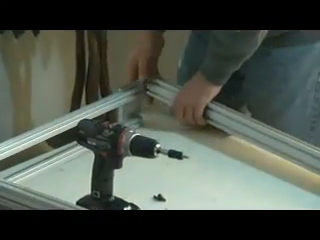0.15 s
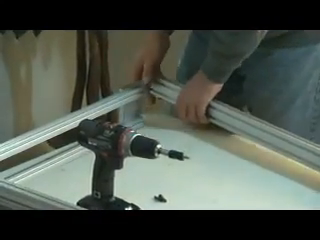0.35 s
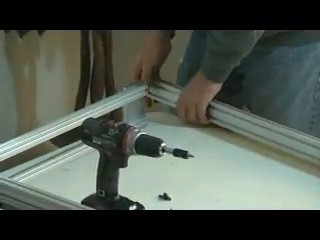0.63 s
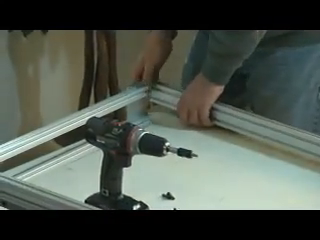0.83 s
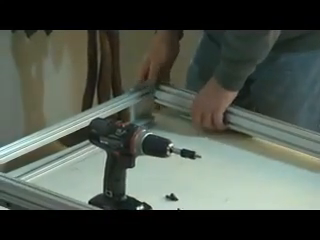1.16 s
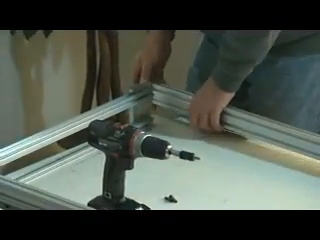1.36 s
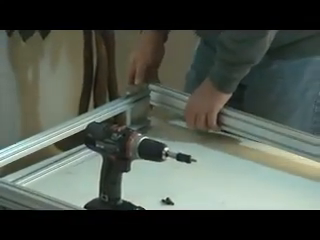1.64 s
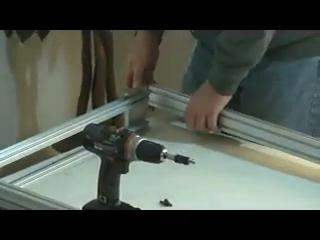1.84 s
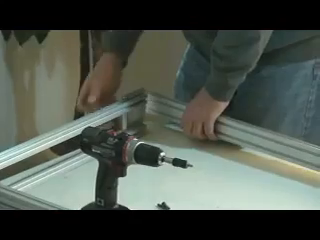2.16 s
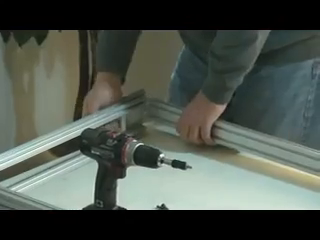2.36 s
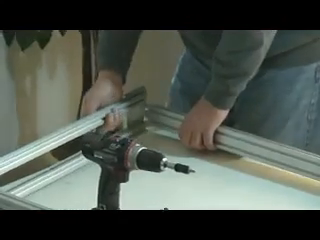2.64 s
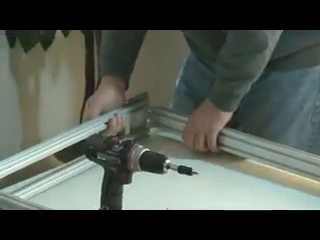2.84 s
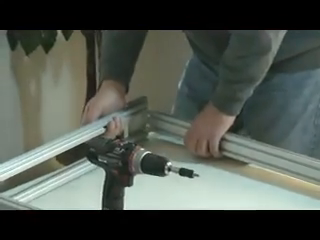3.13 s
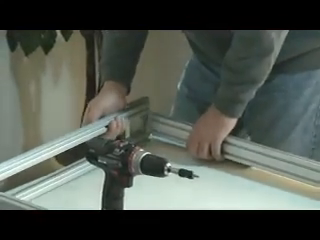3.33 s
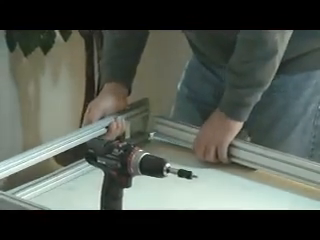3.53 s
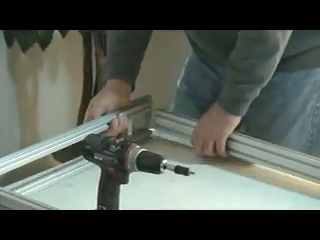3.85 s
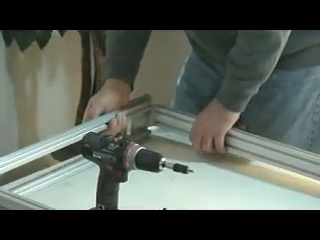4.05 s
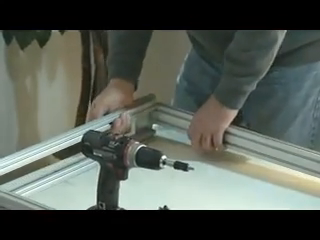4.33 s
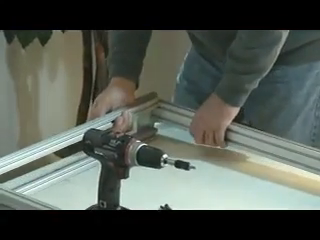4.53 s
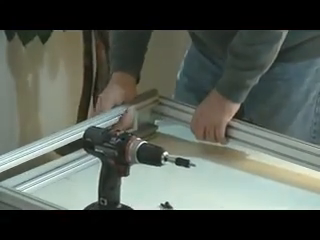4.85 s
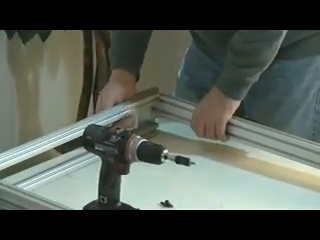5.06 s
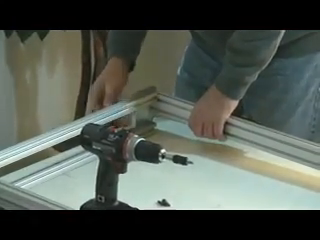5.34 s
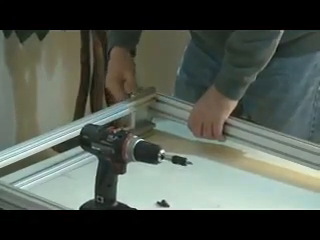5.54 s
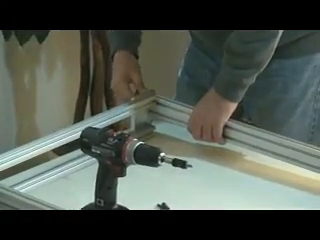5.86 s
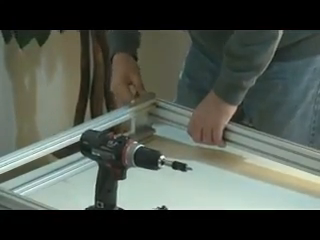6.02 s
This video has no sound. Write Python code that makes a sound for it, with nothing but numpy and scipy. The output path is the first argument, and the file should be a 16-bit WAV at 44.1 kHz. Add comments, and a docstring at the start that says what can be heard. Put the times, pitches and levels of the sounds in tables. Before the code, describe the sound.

Aluminium rails drag with a dull, rasping scrape, then bang together in resonant clusters with bench thuds in a small, echoing workshop.

```python
"""Aluminium rails fitted by hand

Hollow rails are fitted on a bench in a small, live workshop. One is dragged over the bench, then along its
neighbour: streams of stick-slip clicks drive the rail, over bench judder. Small shifts in the hand rub likewise.
Knocks sum a crack, ringing modes, echoes, edge grit, frame thud and bench boom. A corner plate clinks near
the start and at the end, from its own modes and echoes. Shaped noise and faint wavering tones lie underneath."""
import sys
import numpy as np
from scipy import signal
from scipy.fft import rfft, irfft, next_fast_len
from scipy.io import wavfile

SR = 44100
rng = np.random.default_rng(int(sys.argv[2]) if len(sys.argv) > 2 else 0)


def persist_wave(psi):
    """Save psi, clipped to +-1, as 16-bit WAV."""
    counts = np.round(np.clip(psi, -1, 1) * 32767).astype(np.int16)
    wavfile.write(sys.argv[1], SR, np.atleast_2d(counts).T)


N = 272979
RING_S = np.arange(3 * SR // 4) / SR   # time axis of one blow's decay
BENCH_HZ = 102.1   # lowest mode of the bench top


def from_db(db):
    """Decibels to amplitude."""
    return 10 ** (np.asarray(db) / 20)


def rms_one(x):
    """Scales to rms 1."""
    return x / np.sqrt(np.mean(x ** 2) + 1e-20)


def cut(x, hz, kind, order=2):
    """Butterworth filter."""
    sos = signal.butter(order, np.clip(hz, 10, .45 * SR), kind, fs=SR, output="sos")
    return signal.sosfilt(sos, x)


def resonance(x, hz, width_hz):
    """Two-pole resonance, gain 1 on top."""
    r = np.exp(-np.pi * width_hz / SR)
    numerator = np.array([1, 0, -1]) * (1 - r * r) / 2
    denominator = [1, -2 * r * np.cos(2 * np.pi * hz / SR), r * r]
    return signal.lfilter(numerator, denominator, x)


def at_hz(points, hz):
    """Reads a table of (Hz, value) on a log frequency axis."""
    table_hz, value = np.array(points).T
    return np.interp(np.log(hz + 1e-9), np.log(table_hz), value)


def drift(rate_hz):
    """Slow random drift: normal knots of spread 1, joined by lines."""
    knots = rng.standard_normal(1024)
    return np.interp(np.arange(N) / SR * rate_hz, np.arange(len(knots)), knots)


def fade(t60_s):
    """Exponential decay, 60 dB in t60_s."""
    return np.exp(-np.log(1000) * RING_S / t60_s)


def swell(t, start_s, end_s, attack_s, release_s):
    """Attack, hold and release, in straight lines."""
    return np.clip(np.minimum((t - start_s) / attack_s, (end_s - t) / release_s), 0, 1)


def add(out, s, sound):
    """Mixes a stereo sound in at time s."""
    start = round(s * SR)
    out[:, start:start + sound.shape[1]] += sound[:, :N - start]


def stereo(mid, side):
    """Left and right from mid and side."""
    return mid + side * np.array([[1], [-1]])


# stereo width, bass alike and middle range different: freq_hz, side_re_mid_db
WIDTH = [(100, -19), (170, -17), (260, -19), (400, -10.5), (600, -8), (1000, -5.5), (2000, -3),
         (4000, -2.5), (8000, -37), (11500, -37)]


def coloured(points, size, width=WIDTH):
    """Stereo noise with the spectrum of a (Hz, dB) table."""
    padded = next_fast_len(size)
    hz = np.arange(padded // 2 + 1) * SR / padded
    mid, side = rfft(rng.standard_normal((2, padded))) * from_db(at_hz(points, hz))
    side = side * from_db(at_hz(width, hz))
    return irfft(stereo(mid, side), padded)[:, :size]


# workshop air spectrum: freq_hz, relative_density_db
AIR_SPECTRUM = [(12, -38), (22, -10), (45, 3), (80, -14), (110, -8), (200, -11), (380, -11), (600, -15),
                (1500, -21), (2500, -26), (5000, -29.5), (10000, -33.5), (12500, -30), (15000, -39.5)]
# width of the air noise: freq_hz, side_re_mid_db
AIR_WIDTH = [(60, -22), (99, -10.5), (160, -6.5), (270, -5.5), (450, -4), (740, -1), (1220, 0.5), (2010, 2),
             (3330, 1), (5500, -8.5), (9080, -8), (15000, -34)]
# hum and thin electrical whine, centre values: freq_hz, level_db (rms)
HUM_TONES = [(37.7, -57), (120, -66), (322, -68), (435, -63), (3031, -81), (5970, -81), (8969, -84),
             (14244, -81)]


def workshop_air(air_db=-46, wander_hz=2.69, waver_db=2):
    """Steady shaped noise, with faint tones drifting in pitch and level."""
    air = from_db(air_db) * rms_one(coloured(AIR_SPECTRUM, N, AIR_WIDTH))
    for tone_hz, level_db in HUM_TONES:
        phase = 2 * np.pi * np.cumsum(tone_hz + wander_hz * drift(12)) / SR
        gain = from_db(level_db + waver_db * drift(1.8))
        air = air + np.sqrt(2) * gain * np.sin(phase)
    return air


def reflections(colour, early=0.34, early_t60_s=0.048, late_t60_s=0.7, treble_t60_s=0.46, dull_hz=3000):
    """Dense workshop echoes: strong from nearby surfaces at first, the treble dying sooner."""
    noise = coloured(colour, len(RING_S))
    low = cut(noise, dull_hz, "low", order=1)
    late = low * fade(late_t60_s) + (noise - low) * fade(treble_t60_s)
    return late + early * noise * fade(early_t60_s)


def ringing(modes, lift_db=0, flutter=.6, count=40):
    """Decaying modes; echoes of each mode add to it and make its level and phase flutter."""
    hz, level_db, t60_s = np.transpose(modes)[:, :, None]
    turn = (2 * np.pi * hz * RING_S).astype(np.float32)
    fine = np.linspace(0, count - 1, len(RING_S))
    waves = []
    for share_db in (0, at_hz(WIDTH, hz)):   # mid, then side
        echoes = rng.standard_normal((len(hz), count, 2)) @ [1, 1j]
        paths = np.exp(2j * np.pi * rng.random(hz.shape)) + flutter * echoes
        smooth = np.array([np.interp(fine, np.arange(count), path) for path in paths])
        envelope = smooth * fade(t60_s)
        wave = envelope.real * np.sin(turn) + envelope.imag * np.cos(turn)
        waves.append(np.sum(from_db(level_db + lift_db + share_db) * wave, axis=0))
    return stereo(*waves)


# corner plate touching the rail: start_s, level_db
CLINKS = [(0.243, -63), (5.997, -41.5)]
# plate modes: freq_hz, relative_db, t60_s
PLATE_MODES = [(1441, 0, .55), (2234, -1, .7), (2264, -1, .7), (2305, -6, .6), (2475, -8, .5),
               (3190, -8, .5), (3590, -11, .5), (4235, -6, .5), (4325, -7, .5), (5080, -10, .5),
               (6340, -18, .4)]


def clinks(room_db=5, low_hz=1300, high_hz=5400):
    """The small plate rattles and rings high; it does not move the bench."""
    out = np.zeros((2, N))
    tick_colour = [(low_hz / 2, -12), (low_hz, 0), (high_hz, -2), (2 * high_hz, -18)]
    for start_s, level_db in CLINKS:
        tick = from_db(room_db) * reflections(tick_colour)
        plate = .55 * ringing(PLATE_MODES, flutter=1.0, count=110)
        add(out, start_s, from_db(level_db) * (plate + tick))
    return out


# bending and wall modes of the rails: freq_hz, relative_db, t60_s
RAIL_MODES = [(234, -7, .5), (279, -4, .55), (335, -2, .55), (378, -5, .6), (420, -8, .55), (620, -4, .6),
              (689, -3, .65), (767, -4, .5), (975, -3, .65), (1037, -2.5, .7), (1092, -4, .65),
              (1196, -3, .55), (1293, -3, .55), (1371, -2, .8), (1474, 0, .7), (1606, -1, .6),
              (1860, 1, .6), (2235, 2, .6), (2305, -1, .6), (2514, -6, .6), (2840, 0, .65), (3180, -6, .55),
              (3321, -1, .55), (3540, -2, .55)]


def rail_response(crack, modes_db, colour, lift_db=0, lowest_hz=210, wall_hz=3900, room_db=-3.5):
    """One click on a rail: direct crack, ringing modes and room; the slim profile radiates little bass."""
    direct = cut(crack * (RING_S == 0), wall_hz, "low", order=3)
    modes = from_db(modes_db) * ringing(RAIL_MODES, lift_db)
    room = from_db(room_db) * reflections(colour)
    return cut(direct + modes + room, lowest_hz, "high")


# rail pressed to a surface while sliding: freq_hz, relative_db
RUB_COLOUR = [(150, -1.5), (210, -1), (290, 0), (390, 0), (480, -0.5), (650, 1), (830, 8), (1100, 3.5),
              (1400, 4.5), (3500, -0.5), (5500, -6), (10000, -16.5)]


def friction(level_db, low_hz, high_hz, slips_per_s, uneven_db, modes_db, order=2):
    """Stick and slip: a stream of uneven clicks into the rail, in a band set by the surfaces that rub."""
    struck = rng.random(N) < slips_per_s / SR
    slips = struck * rng.standard_normal(N) * from_db(uneven_db * drift(45))
    pressed = rail_response(crack=14.3, modes_db=modes_db, colour=RUB_COLOUR, lowest_hz=113)
    pressed = pressed * fade(2.05)   # the contact damps the ring
    body = cut(pressed, [low_hz, high_hz], "band", order=order)
    body = body / np.sqrt(np.sum(body ** 2) / 2)
    drive = rms_one(slips) * from_db(level_db)
    return signal.fftconvolve(drive[None], body, axes=1)[:, :N]


# small shifts of the rail in the hand: start_s, length_s, level_db, brightness_db
NUDGES = [(0.416, 0.14, -54, -7.5), (2.22, 0.094, -69.5, 21.5), (2.388, .12, -51, 3.5),
          (3.14, 0.48, -54, -1), (3.477, 0.26, -50, 10), (3.826, 0.62, -52, -2.5)]


def nudges(t, rumble_db=1, rasp_db=-2.0, hiss_db=-3, attack_s=0.071, release_s=0.026):
    """Gains of rumble, rasp and hiss for the small shifts; brightness tips each from rumble to hiss."""
    gains = 0
    for start_s, length_s, level_db, bright_db in NUDGES:
        balance_db = np.array([[rumble_db - bright_db], [rasp_db], [hiss_db + bright_db]])
        envelope = swell(t, start_s, start_s + length_s, attack_s, release_s)
        gains = gains + from_db(level_db + balance_db) * envelope
    return gains


# the long drag: time_s, rub_db, treble_db
DRAG = [(0.56, -46, -64), (0.674, -31.5, -61), (0.928, -29.5, -50.5), (1.028, -30, -52.5),
        (1.15, -31.5, -42), (1.26, -27.5, -30.5), (1.326, -32.5, -48), (1.362, -48, -39), (1.42, -36, -55)]
# the rail's weight passes from bench to neighbour; the rub tips from rumble to rasp
HANDOVER_S, HANDOVER_TAKES_S, HANDOVER_DB = 1.045, .05, 4.5


def drag(t, rumble_db=-1, rasp_db=-5, hiss_db=0):
    """The same three gains in the long drag: dull on the bench, raspier on the other rail."""
    time_s, rub_db, treble_db = np.transpose(DRAG)
    rub_db, treble_db = np.interp(t, time_s, rub_db), np.interp(t, time_s, treble_db)
    tip_db = HANDOVER_DB * np.clip((t - HANDOVER_S) / HANDOVER_TAKES_S, 0, 1)
    gains = from_db([rub_db + rumble_db - tip_db, rub_db + rasp_db + tip_db, treble_db + hiss_db])
    return gains * (t > time_s[0]) * (t < time_s[-1])


def bench_judder(t, rumble_db, firm_db=-31.5, shake_db=-33, shake_follows=.35, shake_hz=30):
    """Slips lock to the bench mode only under a firm drag; stray ones shake it unevenly."""
    firm = from_db(firm_db) * swell(t, start_s=0.497, end_s=0.99, attack_s=0.16, release_s=0.14)
    phase = 2 * np.pi * np.cumsum(BENCH_HZ + 3 * drift(15.8)) / SR
    locked = firm * np.sqrt(2) * np.sin(phase)
    shaken = resonance(cut(rng.standard_normal(N), 280, "low"), BENCH_HZ, shake_hz)
    stray = from_db(shake_db + shake_follows * rumble_db) * rms_one(shaken)
    return cut(locked + stray, [BENCH_HZ - 25, BENCH_HZ + 40], "band", order=1)


def slides(build_up_s=0.012, sizzle_db=-14):
    """Rubbing rail: the bench judders and rumbles, the metal rasps, hisses and sizzles."""
    t = np.arange(N) / SR
    early = t + build_up_s   # gains lead, as the ring takes time to build up
    rumble_db, rasp_db, hiss_db = 20 * np.log10(drag(early) + nudges(early) + 1e-9)
    judder = bench_judder(t, rumble_db)
    rumble = friction(rumble_db, low_hz=139, high_hz=480, slips_per_s=1200, uneven_db=0.0, modes_db=-35.5)
    rasp = friction(rasp_db, low_hz=644, high_hz=1400, slips_per_s=1600, uneven_db=3.5, modes_db=-34.5)
    hiss = friction(hiss_db, low_hz=2000, high_hz=5000, slips_per_s=1500, uneven_db=2, modes_db=-26)
    sizzle = friction(hiss_db + sizzle_db, low_hz=5000, high_hz=12000, slips_per_s=5000,
                      uneven_db=1.5, modes_db=-45)
    return judder + rumble + rasp + hiss + sizzle


def bench_boom(swell_s=0.038, t60_s=0.41):
    """The bench top's lowest mode swells as the blow spreads through it."""
    envelope = (1 - np.exp(-(RING_S / swell_s) ** 2)) * fade(t60_s)
    return 2 * envelope * np.sin(2 * np.pi * BENCH_HZ * RING_S)


def frame_thud(swell_s=0.035, t60_s=0.66):
    """The whole frame rocks on the bench a moment after the blow."""
    noise = coloured([(35, -38), (65, -2.0), (125, -34), (160, 2), (200, -4), (240, 5), (350, 1.0),
                      (480, 2.5), (850, -24), (3000, -70)], len(RING_S))
    return noise * (1 - np.exp(-(RING_S / swell_s) ** 2)) * fade(t60_s)


def grit(t60_s=0.82):
    """Sharp edges graze as they meet: a bright spray of noise, dying away."""
    noise = coloured([(500, -26), (2500, -3.5), (4500, -10.5), (7000, -14.5), (10000, -24), (15000, -39)],
                     len(RING_S))
    return noise * fade(t60_s)


# rail against rail: start_s, clank_db, hardness_hz, first_mode_hz, second_mode_hz, mode_lift_db, thud_db, boom_db
KNOCKS = [(2.347, -33.5, 1170, 617, 767, 3, -54, -65), (2.504, -9, 1310, 1037, 1500, 12, -8, -27),
          (2.802, -13, 1500, 945.6, 1420, 32, -6.5, -60), (2.913, -24, 756, 420, 975, 4, -24, -33.5),
          (3.054, -27.5, 1570, 620, 1420, 20, -22.5, -41.5), (3.493, -11, 1330, 1037, 767, 10.5, -17, -16),
          (3.507, -8, 825, 234, 767, 10.5, -7, -22.5), (3.651, -24, 1150, 378, 689, -13, -25, -35.5),
          (4.363, -10.5, 1820, 960, 1860, 3, -8.5, -24.5), (4.4204, -6.5, 2900, 335, 1092, 10.5, -9.5, -25),
          (5.096, -26, 1120, 689, 1037, 5.5, -20, -32.5), (5.262, -37, 990, 684, 767, 9, -35, -62)]
# crowd of weaker modes, in clusters, thinning above the wall resonances: freq_hz, relative_db
RAIL_COLOUR = [(120, 4.5), (330, -7), (740, 4.5), (850, -2.5), (990, 7), (1180, -4), (1330, 4), (1530, 3),
               (2050, 2.5), (2400, 2), (2700, 1), (3600, -2), (3850, -5.5), (4900, -0.5), (10000, -15)]


def knocks(favour_width=0.027, crack_from_hz=690, grit_db=-21.5):
    """A harder contact cracks more and reaches higher modes; the spot struck sets the level of two of them."""
    out = np.zeros((2, N))
    mode_hz = np.array(RAIL_MODES)[:, :1]
    for start_s, clank_db, hard_hz, first_hz, second_hz, lift_db, thud_db, boom_db in KNOCKS:
        favour = sum(np.exp(-(np.log(mode_hz / hz) / favour_width) ** 2) for hz in (first_hz, second_hz))
        crack = (hard_hz / crack_from_hz) ** 2
        struck = rail_response(crack, modes_db=-22, colour=RAIL_COLOUR, lift_db=lift_db * favour)
        clank = cut(struck, hard_hz, "low", order=3) + from_db(grit_db) * grit()
        thud = from_db(thud_db) * frame_thud()
        boom = from_db(boom_db) * bench_boom()
        add(out, start_s, from_db(clank_db) * clank + thud + boom)
    return out


def scene():
    """Handling sounds over the room's floor."""
    return workshop_air() + clinks() + slides() + knocks()


def record(dry, cutoff_hz=15050):
    """Full scale limits the peaks, then the top is cut."""
    top_cut = signal.ellip(12, .1, 80, cutoff_hz, fs=SR, output="sos")
    return signal.sosfilt(top_cut, np.clip(dry, -1, 1))


dry = scene()
out = record(dry)
persist_wave(out)
```